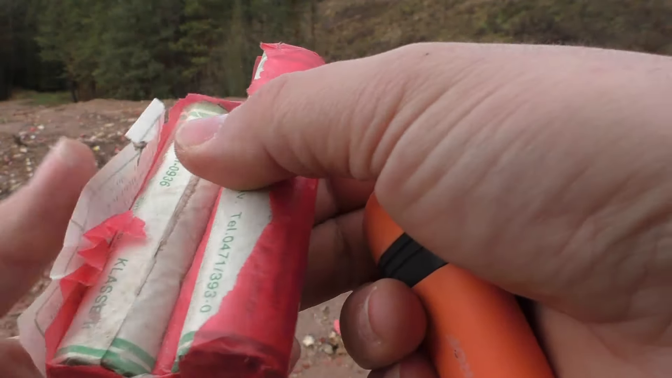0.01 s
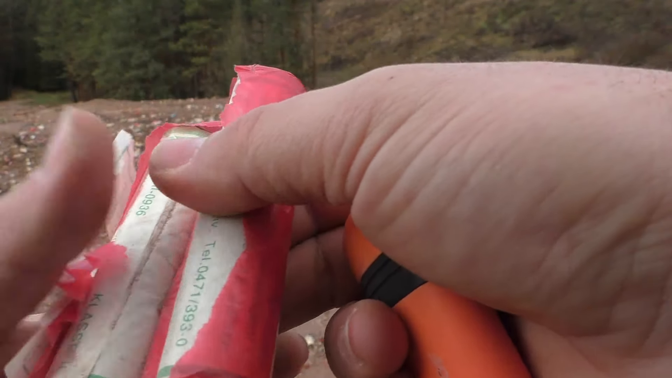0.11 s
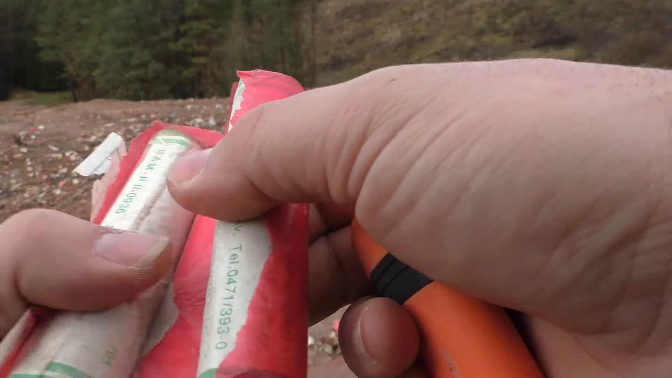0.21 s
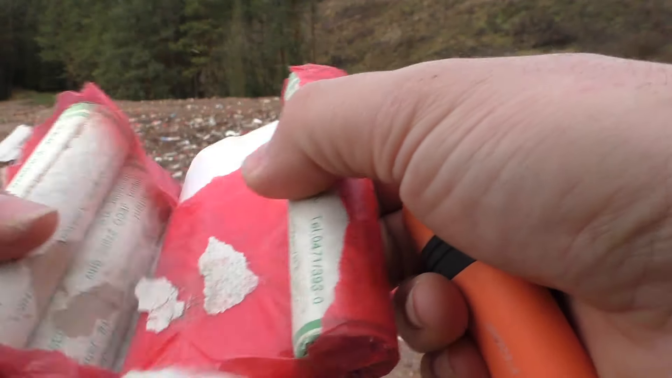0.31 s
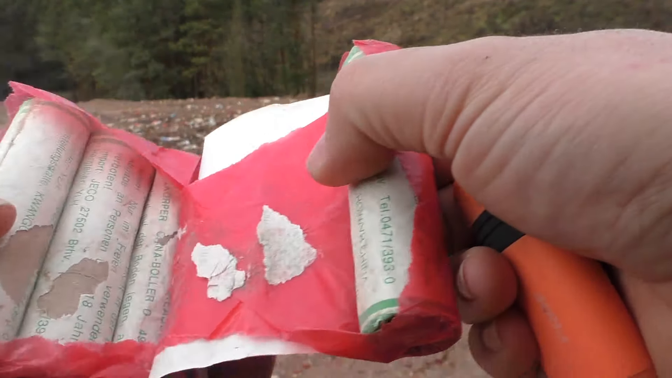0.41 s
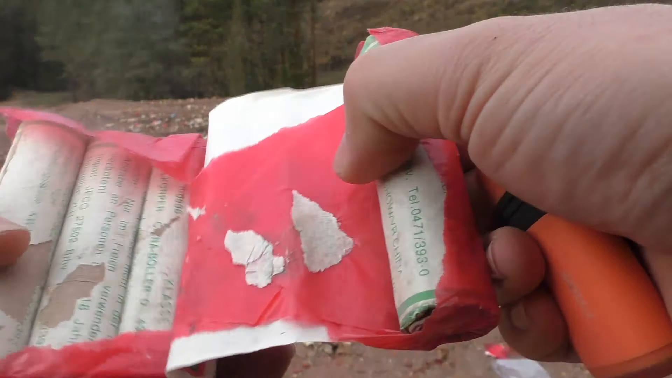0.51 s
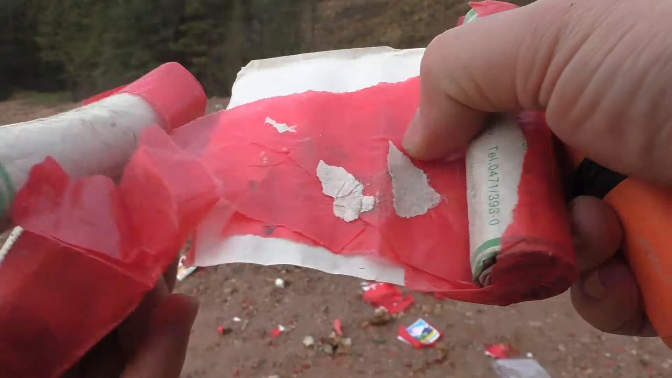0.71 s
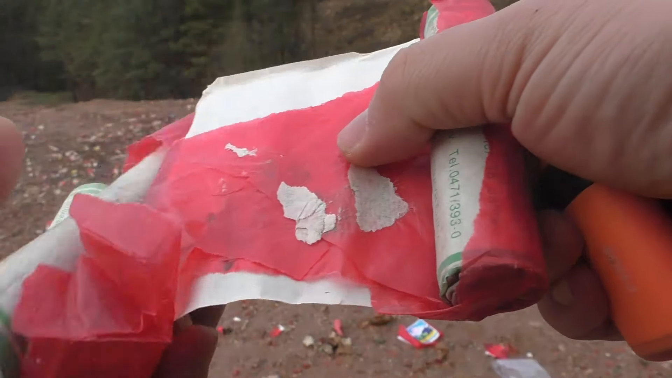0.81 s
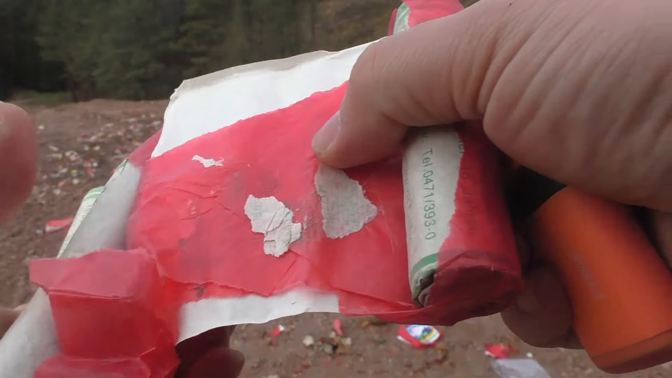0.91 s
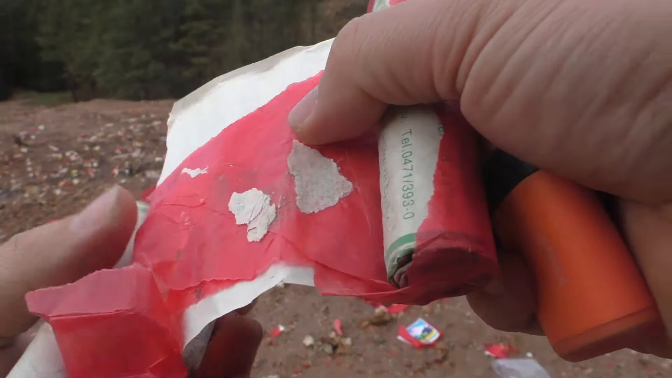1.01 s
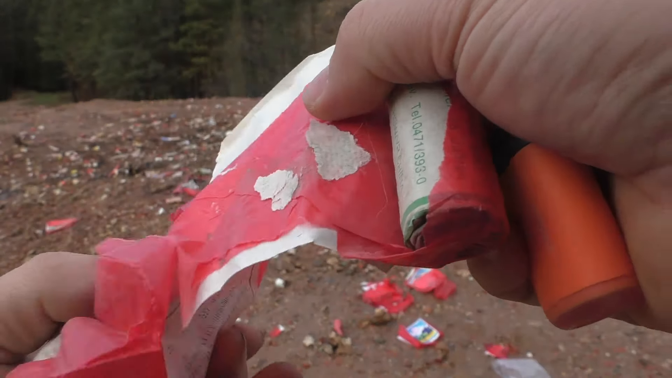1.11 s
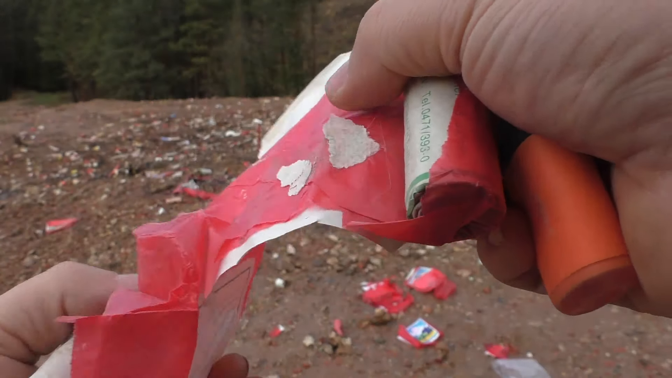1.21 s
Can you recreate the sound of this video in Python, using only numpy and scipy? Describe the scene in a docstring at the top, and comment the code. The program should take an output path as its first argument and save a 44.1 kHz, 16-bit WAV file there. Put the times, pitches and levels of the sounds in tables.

```python
"""Two hands tear and crumple a thin paper wrapper close to a small camera, outdoors on a calm day.
Dense showers of random clicks are the breaking fibres; each click starts a tiny dying burst of noise.
Listed single clicks are creases that snap, slower bursts are the sheet flapping low,
and short fading sine waves are low bumps. Filtered noise makes the faint wind underneath."""
import sys
import numpy as np
from scipy import signal
from scipy.fft import rfft, irfft
from scipy.io import wavfile
from scipy.ndimage import uniform_filter1d

SR = 44100
rng = np.random.default_rng(int(sys.argv[2]) if len(sys.argv) > 2 else 0)


def materialize(psi):
    """Save the field psi as 16-bit PCM at rate SR to the path in sys.argv[1].

    A 1-D psi becomes a single channel; in a 2-D psi each row is a channel.
    """
    bounded = np.clip(np.atleast_2d(psi).T, -1, 1)
    quanta = np.round(bounded * 32767).astype(np.int16)
    wavfile.write(sys.argv[1], SR, quanta)


def attenuation_scalar(level_db):
    """Turn a level in dB into a linear amplitude multiplier (20 dB per decade)."""
    decades = np.asarray(level_db, float) / 20
    return 10 ** decades


N = 57330  # length of the sound in samples

# How hard the hands pull. Each row: time in seconds, level of the cracks in dB before clumping,
# level of the sheet's body sound in dB relative to the cracks.
PULL = [(0, -51.5, 6.5), (0.02, -45, 1), (0.036, -61, 4.5), (0.053, -49.5, 8), (0.063, -59, -1),
        (0.08, -76, 11), (0.091, -52.5, -4), (0.128, -47, -7.5), (0.146, -45.5, 13), (0.165, -45, 0.5),
        (0.185, -39.5, -3), (0.207, -30.5, -0.5), (0.235, -23.5, -1.5), (0.272, -26.5, 3),
        (0.284, -23.5, -5.5), (0.292, -20, 5), (0.315, -21.5, 2), (0.347, -19.5, 1), (0.385, -22.5, 2),
        (0.407, -35, -0.5), (0.43, -34, -1.5), (0.456, -31, -0.5), (0.464, -46, -1), (0.485, -42, 1),
        (0.496, -54.5, 5), (0.507, -36.5, -1.5), (0.515, -36.5, -5), (0.528, -25, -5), (0.559, -21, -4.5),
        (0.585, -24, -2), (0.604, -19.5, -2.5), (0.623, -28.5, -1), (0.661, -26, -2.5), (0.696, -35.5, -2),
        (0.727, -27.5, -2.5), (0.747, -37.5, -1.5), (0.776, -27.5, -3.5), (0.795, -30.5, -0.5),
        (0.827, -42.5, 3.5), (0.861, -34.5, -5), (0.893, -42.5, 3), (0.95, -42, 0), (1.005, -46.5, 0.5),
        (1.04, -44.5, 3.5), (1.065, -39, 0.5), (1.1, -33, 2), (1.151, -42.5, 1.5), (1.171, -29, 0),
        (1.19, -44.5, 0.5), (1.211, -48, 4.5), (1.242, -55.5, 8), (1.27, -45, -0.5), (1.3, -35.5, -8.5)]
# Slack sheet flapping low. Each row: time in seconds, level in dB.
FLAPPING = [(0, -70), (.17, -53.5), (.205, -54), (.25, -40), (.284, -36.5), (.292, -18.5), (.315, -28),
            (.345, -22.5), (.375, -27), (.405, -40), (.43, -42.5), (.455, -30), (.497, -61), (.508, -42),
            (.525, -25.5), (.56, -24), (.605, -33), (.625, -34), (.67, -32), (.695, -41.5), (.745, -36.5),
            (.795, -42.5), (.825, -48.5), (.87, -40), (.91, -50.5), (1.03, -55.5), (1.065, -42.5),
            (1.1, -40.5), (1.15, -53.5), (1.17, -38.5), (1.21, -56.5), (1.25, -47), (1.3, -53)]
# How strong the top treble is. Each row: time in seconds, level in dB relative to the cracks.
FIZZ_LEVEL = [(0, 7), (.15, 1), (.26, -1), (.35, 2.5), (.4, -1.5), (.48, 4.5), (.56, 1), (.7, 1.7),
              (.74, 0), (.8, -1.5), (.93, 0), (1.02, 3), (1.18, -1.5), (1.23, 3), (1.3, -5)]
# Single creases that snap. Each row: time in seconds, level of the crack in dB,
# level of the sheet's body sound in dB, both as the average (rms) over the span of a snap.
SNAPS = [(0.0073, -40.0, -44.0), (0.0155, -37.0, -51.0), (0.0248, -35.0, -40.0), (0.0338, -40.0, -54.0),
         (0.0917, -42.0, -47.0), (0.099, -39.0, -57.0), (0.1057, -34.0, -48.0), (0.1166, -44.0, -50.0),
         (0.121, -37.0, -53.0), (0.148, -30.0, -32.0), (0.1517, -33.0, -29.0), (0.1585, -37.0, -42.0),
         (0.1746, -38.0, -52.0), (0.1901, -33.0, -35.0), (0.1954, -32.0, -30.0), (0.2074, -30.0, -41.0),
         (0.2215, -24.0, -28.0), (0.242, -24.0, -26.0), (0.2325, -22.0, -27.0), (0.2388, -22.0, -24.0),
         (0.2554, -23.0, -20.0), (0.2615, -28.0, -15.0), (0.2646, -20.0, -15.0), (0.2875, -19.0, -12.0),
         (0.301, -26.0, -19.0), (0.3102, -21.0, -25.0), (0.3525, -18.0, -24.0), (0.4117, -27.0, -36.0),
         (0.4215, -28.0, -38.0), (0.4355, -27.0, -45.0), (0.439, -38.0, -30.0), (0.4486, -27.0, -28.0),
         (0.4528, -26.0, -35.0), (0.4585, -40.0, -33.0), (0.4693, -33.0, -45.0), (0.4745, -29.0, -27.0),
         (0.4876, -30.0, -35.0), (0.5109, -27.0, -26.0), (0.5261, -25.0, -38.0), (0.5363, -24.0, -24.0),
         (0.5663, -19.0, -30.0), (0.6006, -25.0, -30.0), (0.642, -27.0, -32.0), (0.6455, -26.0, -32.0),
         (0.6495, -26.0, -32.0), (0.658, -27.0, -30.0), (0.702, -36.0, -40.0), (0.7351, -23.0, -28.0),
         (0.7395, -23.0, -30.0), (0.7498, -44.0, -29.0), (0.7555, -31.0, -34.0), (0.7644, -29.0, -26.0),
         (0.7694, -25.0, -40.0), (0.7771, -24.0, -31.0), (0.7828, -26.0, -30.0), (0.8039, -32.0, -37.0),
         (0.8399, -32.0, -51.0), (0.8518, -31.0, -37.0), (0.8715, -30.0, -38.0), (0.8862, -35.0, -33.0),
         (0.9573, -32.0, -38.0), (0.9642, -38.0, -34.0), (1.0199, -36.0, -40.0), (1.0324, -28.0, -43.0),
         (1.0542, -32.0, -32.0), (1.0598, -39.0, -35.0), (1.066, -33.0, -42.0), (1.0863, -24.0, -42.0),
         (1.0878, -27.0, -34.0), (1.1103, -36.0, -42.0), (1.1671, -34.0, -32.0), (1.1769, -37.0, -31.0),
         (1.183, -32.0, -40.0), (1.2198, -30.0, -39.0), (1.2355, -41.0, -47.0), (1.2464, -40.0, -48.0),
         (1.2671, -39.0, -47.0), (1.2828, -42.0, -41.0), (1.289, -38.0, -46.0)]
# Low bumps as the rolls knock and the sheet pushes air.
# Each row: start in seconds, level in dB, pitch in Hz, time to fade by 60 dB in seconds.
BUMPS = [(.2877, -6, 200, .024), (.2885, -12, 320, .04), (.33, -16, 180, .06), (.474, -26, 200, .02),
         (.511, -20, 250, .02), (.395, -30, 80, .06), (.535, -26, 70, .06), (.55, -20, 290, .04),
         (.6, -19, 60, .09), (.87, -32, 60, .08)]

# The next five are tone colours; only their shape counts, as colour() sets the overall level.
# Crack heard through the camera housing. Each row: frequency in Hz, relative level in dB per Hz.
CRACK_COLOUR = [(1760, -83), (3000, -11), (3350, -24.5), (4120, -12.5), (4450, -23), (5620, -7.5),
                (6630, 0), (7610, 3.5), (8740, 2.5), (10000, -5), (10600, -16), (11500, -35)]
# Top treble of a crack. Each row: frequency in Hz, relative level in dB per Hz.
FIZZ_COLOUR = [(9700, -28), (10600, -13.5), (11600, -6), (13200, -3), (15600, -7)]
# Body of the sheet. Each row: frequency in Hz, relative level in dB per Hz.
BODY_COLOUR = [(260, -31.5), (450, -11), (624, -3), (834, -1.5), (1100, 2), (1200, 1.5), (2060, -1.5),
               (3340, -15.5), (4500, -19), (5850, -11.5), (9900, -120)]
# Low flap of the sheet. Each row: frequency in Hz, relative level in dB per Hz.
FLAP_COLOUR = [(53, -27), (90, -2.5), (291, 0), (355, 0.5), (420, -1), (454, -1.5), (600, -2.5),
               (780, -3.5), (1320, -120)]
# Wind. Each row: frequency in Hz, relative level in dB per Hz.
WIND_COLOUR = [(15, -77), (25, 18), (150, 15), (324, 5.5), (900, -1.5), (1010, 3.5), (1770, -7),
               (2500, -63), (3250, -71), (5500, -120)]

# Four places on the sheet: how long the left port leads the right for cracks, in seconds.
LEADS_S = [.9e-5, 1.9e-5, 2.5e-5, 3.6e-5]
# Left-right balance of the flap at those places, in dB: added on the left, taken off on the right.
FLAP_PAN_DB = [1.5, -1, 3.2, 0.4]
LEFT_DB = 0.4  # balance of the other paper sounds, used the same way
BODY_LEAD = 0.78  # the body and flap lead on the left by this share of the treble's lead
CRACK_T60_S, SNAP_T60_S = 0.004, 0.006  # time for a crack or a snap to fade by 60 dB


def evened(x):
    """Scales a signal to an average (rms) level of 1."""
    return x / np.sqrt(np.mean(x ** 2) + 1e-20)


def colour(points):
    """Makes a filter of energy 1 with the given spectrum that never sounds ahead of its input."""
    f, db = np.transpose(points)
    hz = abs(np.fft.fftfreq(4096, 1 / SR))
    gain_db = np.interp(np.log(hz + 1), np.log(f + 1), db)
    log_gain = np.log(attenuation_scalar(np.maximum(gain_db, -70)))
    # the Hilbert transform finds the phase that puts the energy as early as possible
    spectrum = np.exp(np.conj(signal.hilbert(log_gain)))
    taps = np.fft.ifft(spectrum).real[:2048]
    return taps / np.linalg.norm(taps)


def bursts(clicks, t60, points, clean=0):
    """Turns each click into dying noise of the same energy, a share of it a clean pulse, then colours it."""
    fade = attenuation_scalar(-60 * np.arange(4000) / SR / t60) ** 2
    power = signal.oaconvolve(clicks ** 2, fade[None] / fade.sum(), axes=1)[:, :N]
    noise = np.sqrt(abs(power) * (1 - clean)) * rng.standard_normal(clicks.shape)
    mixed = noise + np.sqrt(clean) * clicks
    return signal.oaconvolve(mixed, colour(points)[None], axes=1)[:, :N]


def ports(places, lead=1, pan_db=LEFT_DB):
    """Sound from each place on the sheet reaches the left port a little before the right."""
    hz = np.fft.rfftfreq(N, 1 / SR)
    left_gain = attenuation_scalar(np.reshape(pan_db, (-1, 1)))
    delay_s = lead * np.array(LEADS_S)[:, None]
    late = irfft(rfft(places) * np.exp(-2j * np.pi * hz * delay_s), N)
    return np.array([(places * left_gain).sum(0), (late / left_gain).sum(0)])


def over_time(times, values):
    """Draws straight lines between the listed values, one value per sample."""
    return np.interp(np.arange(N) / SR, times, values)


def fibre_clicks(level_db):
    """Fibres break at random, more often under a hard pull, with smooth rubbing between the cracks."""
    places = len(LEADS_S)
    # 6000 cracks per second at -20 dB; the rate in dB grows by half the level in dB
    rate = 6000 * attenuation_scalar(0.5 * (level_db + 20))
    chance = np.clip(rate / SR / places, 1e-4, 1)
    size = attenuation_scalar(3.6 * np.minimum(rng.exponential(1, (places, N)), 3))  # some cracks are larger
    # rarer cracks are made larger, so the rate leaves the average power alone
    clicks = size * (rng.random((places, N)) < chance) / np.sqrt(chance)
    rubbing = 0.2  # share of the power
    power = (1 - rubbing) * evened(clicks) ** 2 + rubbing
    return np.sqrt(power / places) * rng.choice([-1, 1], (places, N))


def tearing_shower():
    """Breaking fibres crack in uneven clumps and set off treble, the sheet's body and a low flap."""
    s, level_db, body_db = np.transpose(PULL)
    clump_s = 0.006
    clump = uniform_filter1d(rng.standard_normal(N), size=round(clump_s * SR))
    clump = evened(uniform_filter1d(clump, size=round(clump_s * SR / 2)))
    level_db = over_time(s, level_db) + 1.7 * clump  # clumps vary by 1.7 dB rms
    clicks = fibre_clicks(level_db)
    fizz = attenuation_scalar(over_time(*np.transpose(FIZZ_LEVEL))) * bursts(clicks, CRACK_T60_S, FIZZ_COLOUR)
    cracks = attenuation_scalar(level_db) * (bursts(clicks, CRACK_T60_S, CRACK_COLOUR, clean=0.25) + fizz)
    body = attenuation_scalar(level_db + over_time(s, body_db)) * bursts(clicks, 0.006, BODY_COLOUR)
    flap = attenuation_scalar(over_time(*np.transpose(FLAPPING))) * bursts(clicks, 0.015, FLAP_COLOUR)
    return ports(cracks) + ports(body, BODY_LEAD) + ports(flap, BODY_LEAD, FLAP_PAN_DB)


def crease_snaps():
    """Each crease gives a crack that fizzes out, while the sheet gets one short jolt."""
    s, crack_db, body_db = np.transpose(SNAPS)
    at = np.round(s * SR).astype(int)
    place = np.arange(len(s)) % len(LEADS_S)  # the snaps take the places in turn
    span_s = 0.0025  # the span over which a snap's level counts
    parts = [(crack_db, SNAP_T60_S, CRACK_COLOUR, 1),
             (crack_db - 6, SNAP_T60_S, FIZZ_COLOUR, 1),
             (body_db, 0.007, BODY_COLOUR, BODY_LEAD)]
    out = 0
    for db, t60, points, lead in parts:
        clicks = np.zeros((len(LEADS_S), N))
        clicks[place, at] = attenuation_scalar(db) * np.sqrt(span_s * SR) * rng.choice([-1, 1], len(s))
        out = out + ports(bursts(clicks, t60, points, clean=0.28), lead)
    return out


def low_bumps():
    """Knocks and pushed air are short low swings that die away, a little stronger on the left."""
    out = np.zeros(N)
    for s, db, hz, t60 in BUMPS:
        t = np.maximum(np.arange(N) / SR - s, 0)  # stays at zero, so silent, until the bump starts
        out += attenuation_scalar(db - 60 * t / t60) * np.sin(-2 * np.pi * hz * t)
    return out * attenuation_scalar([[1.1], [-1.1]])


def wind():
    """Wind and outdoor air are coloured noise, partly shared by both ports, that swells unevenly."""
    a, b, gust = rng.standard_normal((3, N))
    same = 0.85  # likeness (correlation) of the two ports
    pair = np.array([a, same * a + np.sqrt(1 - same ** 2) * b])
    gust = evened(uniform_filter1d(uniform_filter1d(gust, size=3000), size=3000))
    level_db = -49 + 2.5 * gust
    return attenuation_scalar(level_db) * signal.oaconvolve(pair, colour(WIND_COLOUR)[None], axes=1)[:, :N]


def scene():
    """Adds the torn paper, its snaps and bumps, and the wind."""
    return tearing_shower() + crease_snaps() + low_bumps() + wind()


def low_pass(x):
    """Removes everything above the highest recorded frequency."""
    return signal.sosfilt(signal.butter(12, 16520, fs=SR, output="sos"), x)


def record(dry):
    """The top treble and deepest bass are filtered off, then the sound clips at full scale."""
    treble_cut = signal.firwin(401, 15880, window=("kaiser", 8), fs=SR)  # edge in Hz
    dull = signal.oaconvolve(dry, treble_cut[None], "same")
    bass_cut = signal.butter(2, 42, "high", fs=SR, output="sos")  # edge in Hz
    mix = np.clip(signal.sosfilt(bass_cut, dull), -1, 1)
    return low_pass(mix)


dry = scene()
out = record(dry)
materialize(out)
```